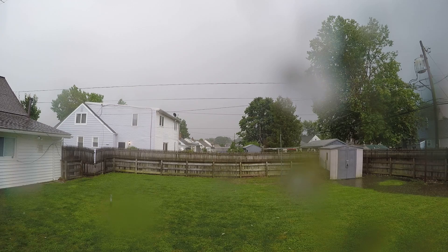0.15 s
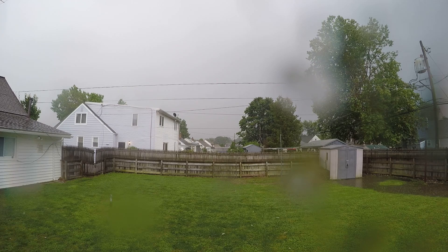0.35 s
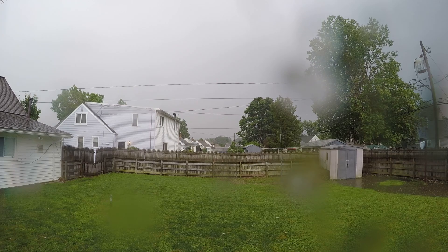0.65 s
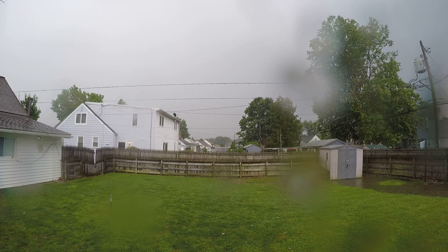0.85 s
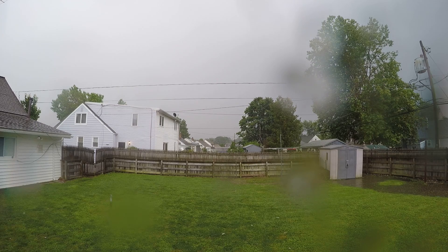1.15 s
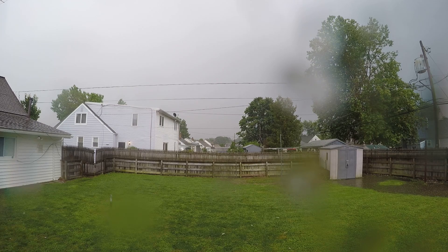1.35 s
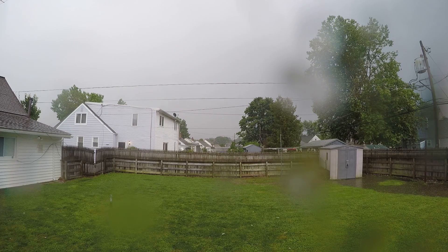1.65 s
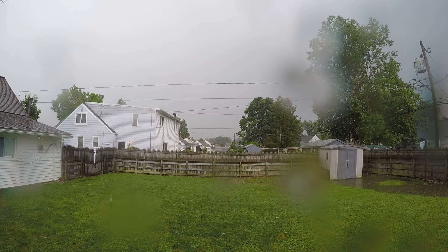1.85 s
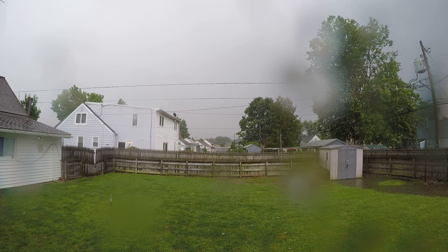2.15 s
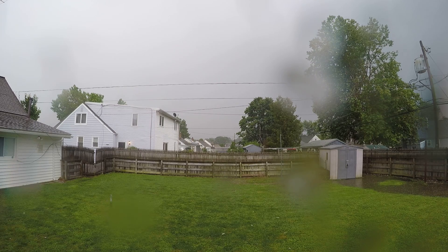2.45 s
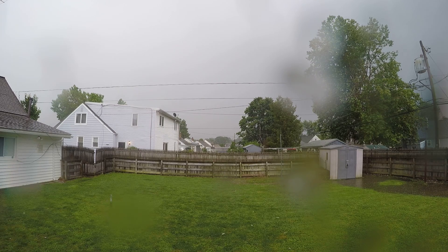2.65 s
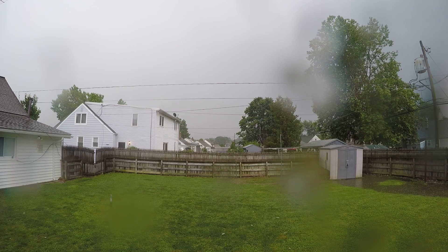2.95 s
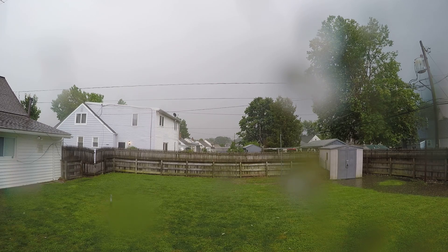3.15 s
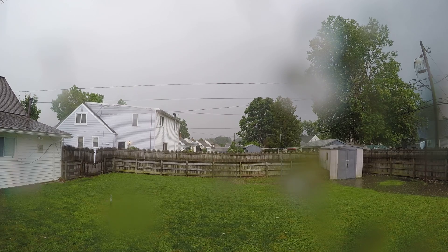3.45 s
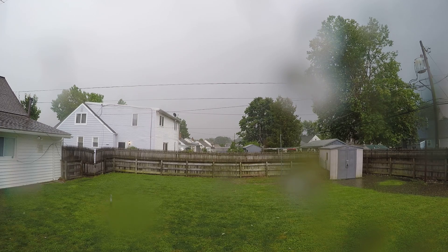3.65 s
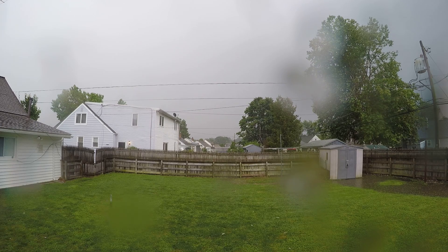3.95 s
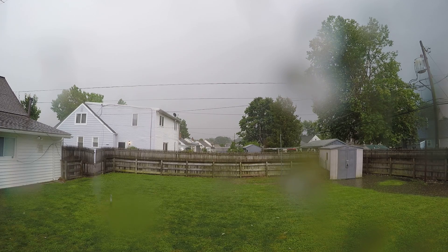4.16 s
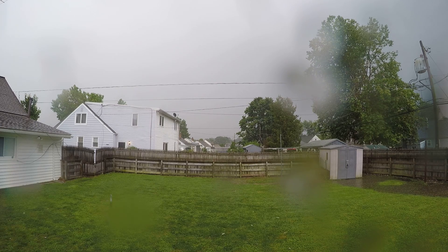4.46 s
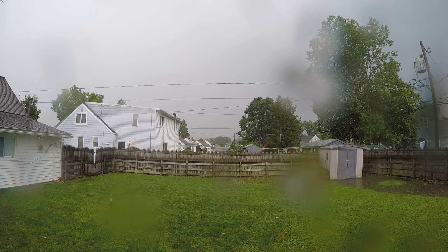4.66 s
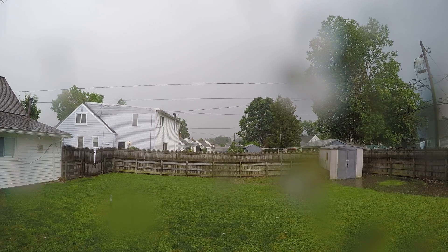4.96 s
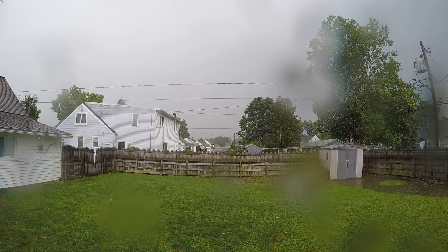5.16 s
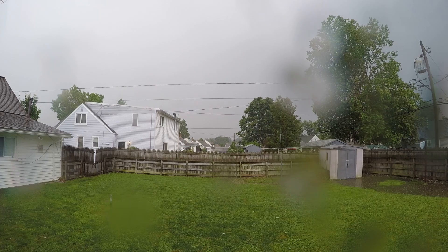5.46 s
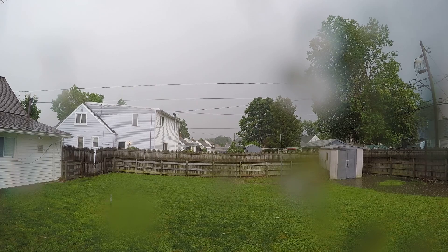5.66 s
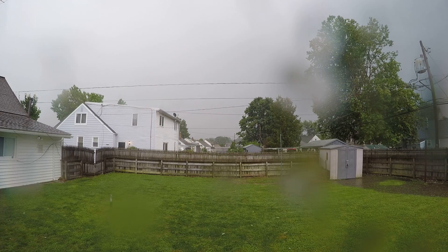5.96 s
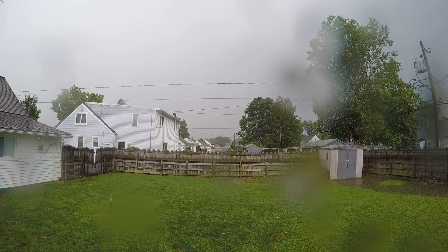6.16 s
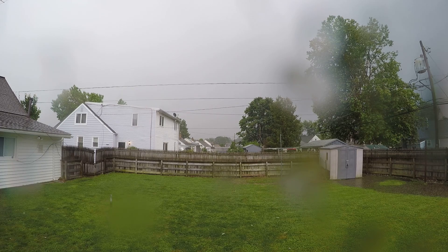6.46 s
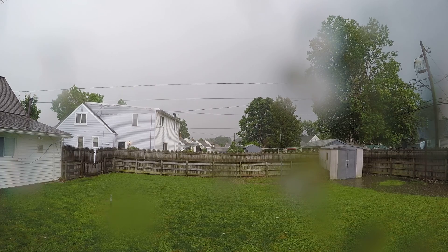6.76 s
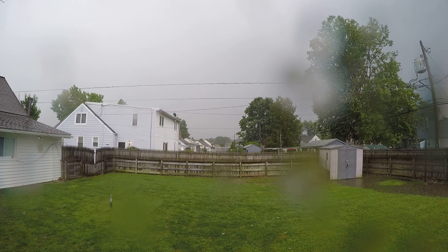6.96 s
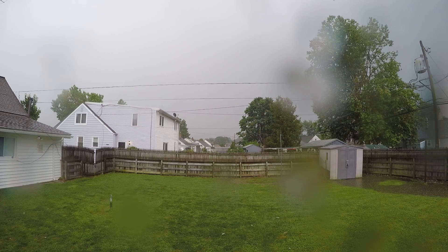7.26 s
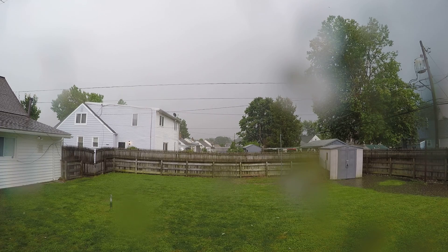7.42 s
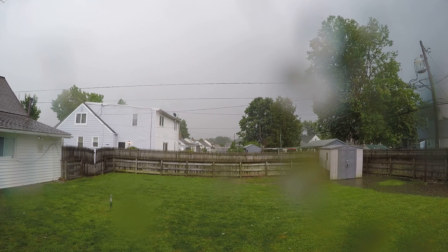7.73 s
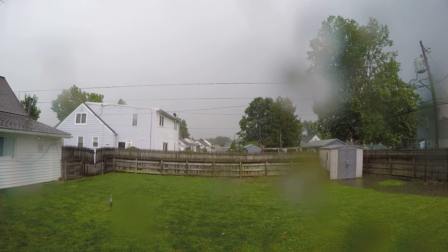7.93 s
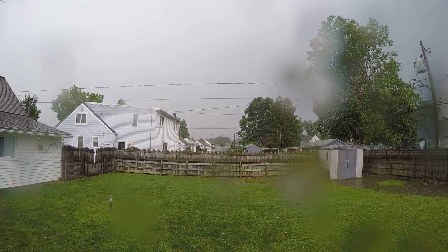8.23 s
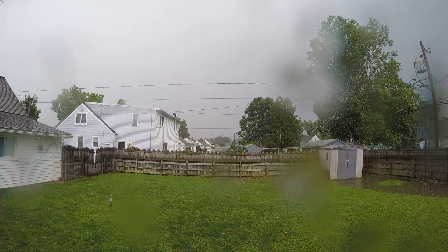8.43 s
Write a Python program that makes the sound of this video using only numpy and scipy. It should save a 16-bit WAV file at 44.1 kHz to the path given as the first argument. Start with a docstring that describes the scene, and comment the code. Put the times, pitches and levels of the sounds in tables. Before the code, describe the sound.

Rain falls on a yard for about eight and a half seconds. In the background, a soft, steady wash covers lawn and roofs, with a fine patter of small drops closer in and a faint, wavering low hum underneath. Up front and far louder, large drops strike the microphone's hard housing as sharp, dry ticks, irregularly and several times a second. Each has a tiny bright splash and a very short ring, and some add a slight low thud. Strong hits land at about 0.4, 2.2, 2.9 and 4.1 seconds. The loudest come at 4.5 and 5.1 seconds, briefly overloading. The background rain swells slightly just after 5 seconds, then dips for half a second while the ticks briefly pause. The tapping resumes, with strong hits near 7.0 and 7.9 seconds, and only lighter ticks follow to the end.

```python
"""A yard in heavy rain, heard by a microphone in a small hard housing on a springy mount.
At the back, rain washes over lawn and roofs above a wavering low hum; closer in, small drops patter.
Up front, large drops hit the housing as sharp ticks: each knocks, splashes, rings the shell,
shakes the mount and throws up spray that falls back. The loudest hits overload."""
import sys
import numpy as np
from scipy import signal
from scipy.io import wavfile

SR = 44100
rng = np.random.default_rng(int(sys.argv[2]) if len(sys.argv) > 2 else 0)


def master(y):
    """Save y as 16-bit WAV."""
    cut = np.clip(np.atleast_2d(y).T, -1, 1)
    pcm = np.round(cut * 32767)  # scale
    wavfile.write(sys.argv[1], SR, pcm.astype(np.int16))


N = 378819

# tone colour of the far rain: f/Hz, relative spectral density/dB
WASH_SPECTRUM = [(20, -15.5), (50, -10.5), (90, -5.5), (170, -5.5), (250, -17), (500, -18.5), (900, -16),
                 (1300, -17), (2000, -10.5), (2900, -18.5), (4000, -20), (5200, -23), (7500, -28),
                 (14500, -35.5), (16000, -35)]
# resonances of the low and the upper hum: f/Hz, width/Hz
HUM_BANDS = [(50, 11), (126, 32)]
# fader curve of the low hum: t/s, level/dB
LOW_HUM_FADER = [(0.0, -52), (0.71, -58.5), (3.73, -47), (4.26, -60.5), (5.19, -50), (5.38, -61.5),
                 (5.79, -53), (8.47, -55), (8.59, -63)]
# wash, upper hum and patter swell and dip briefly together: t/s, gain/dB
RAIN_FADER = [(0, 0.5), (5.03, 2.5), (5.12, 4.5), (5.235, 6.5), (5.255, -2.5), (5.5, -6), (5.57, -2.5),
              (5.85, 1.5), (8.59, 3.5)]
# quickly damped modes of the housing: f/Hz, level/dB, t60/s
KNOCK_MODES = [(782, -6, 0.023), (1048, 1, 0.013), (1280, 0.5, 0.011), (1504, -0.5, 0.0053),
               (1954, 0, 0.011), (2419, -1.5, 0.0063), (2584, -7.5, 0.016), (2848, -3, 0.013),
               (3322, -3.5, 0.0086), (3833, 1.5, 0.0083), (4180, -6, 0.012), (4750, -8, 0.0069),
               (5810, 1.5, 0.0071), (7010, 4, 0.0077)]
# lasting modes of the shell: f/Hz, level/dB, t60/s
SHELL_MODES = [(1150, -27, 0.096), (1790, -3, 0.076), (2120, -5, 0.061), (2550, -14, 0.085),
               (2700, -17, 0.059)]
# a high shell mode that only the bright splash excites: f/Hz, level/dB, t60/s
PING_MODES = [(5755, -32, .05)]
# sway and thud of the mount: f/Hz, level/dB, t60/s
MOUNT_MODES = [(47, -8.5, 0.21), (123.6, 1, 0.25), (210, -10, 0.039), (363, -10.5, 0.0072)]
# large drops on the housing, with three sends relative to the hit's level:
# t/s, level/dB, pitch of the struck spot/Hz, pitch spread/octaves, splash/dB, shell/dB, mount/dB
LARGE_DROPS = [(0.0085, -4, 2320, 0.53, -21, -27, -42), (0.0248, -27.5, 2780.0, 0.55, -26.0, -15, -25),
               (0.21, -26.5, 1510, 0.68, -27.0, -16, -31), (0.2411, -25.5, 2070.0, 0.14, -16, -19, -32),
               (0.3047, -20.5, 1660.0, 0.56, -29, -48.0, -50.0), (0.3575, -7, 1490, 0.25, -48.0, -28, -54),
               (0.4064, 7, 2660, 0.4, -18, -27.5, -39.5), (0.414, -10, 3900.0, 0.33, -22.0, -37.0, -24),
               (0.563, -27, 2070, 0.21, -19.0, -49, -50), (0.706, -14, 2380, 0.44, -17, -32.0, -31.5),
               (1.1946, -12.5, 1870, 0.45, -28.0, -23, -32.5), (1.245, -6.5, 2580, 0.91, 0, -22, -30.5),
               (1.3137, -17, 2620, 0.12, -20, -54.0, -54), (1.3642, -20.5, 3460, 0.57, -4.5, -24, -56.0),
               (1.3794, -17.5, 2620, 0.49, -27.0, -27.0, -59.0),
               (1.4373, -24.5, 2260, 0.22, -19, -48.0, -41), (1.4591, -19.5, 2060, 0.31, -23.0, -17, -33),
               (1.597, -7.5, 3300, 0.64, -2, -29.5, -31.5), (1.645, -19.0, 3120, 0.36, -16, -48.0, -45.0),
               (1.846, -11.5, 2800, 0.54, -14, -30.0, -52.0), (1.9355, -16, 2250, 0.31, -17.5, -25, -38.0),
               (2.0489, -6.5, 2280, 0.38, -17.5, -33, -39.5), (2.215, -9, 3350, 0.23, -23, -44.0, -40),
               (2.2352, 1.5, 3100, 0.55, -20, -26, -42.5), (2.2397, -25, 4500.0, 0.78, -20.0, -35.0, -49),
               (2.3149, -27.5, 1210, 0.58, -36.0, -40.0, -14),
               (2.4762, -20.5, 2650, 0.78, -18, -33.0, -20.5), (2.549, -21.5, 2960, 0.5, -8.5, -45.0, -47),
               (2.5957, -24, 2980, 0.49, -6, -50.0, -24.5), (2.778, -13.5, 2000, 0.41, -21, -15.5, -39),
               (2.7902, -25.5, 2120.0, 0.39, -19.0, -11.0, -28.0),
               (2.85, -26.5, 3500.0, 0.62, -8.0, -47.0, -44.0),
               (2.9227, -0.5, 3180, 0.64, -9.0, -31, -30.5), (3.0331, -15, 2570, 0.38, -8, -57, -25.5),
               (3.2195, -27, 1650, 0.69, -16.0, -21, -43.0), (3.2612, -12, 2230, 0.46, -3, -29, -32),
               (3.2815, -28.5, 2250.0, 0.66, -17, -25.0, -33.0),
               (3.3894, -27, 3450, 0.86, -1.5, -48.0, -30.0), (3.4686, -21, 1930.0, 0.39, -28, -31, -30),
               (3.5222, -7, 2400, 0.43, -16.5, -31, -42), (3.5445, -17.5, 2430, 0.41, -21, -26, -48.0),
               (3.601, -28.5, 2540, 0.55, -18, -46, -40.0), (3.7254, -29, 2680, 0.38, -8, -41.0, -25),
               (4.0122, -19, 1860, 0.48, -26.0, -18.5, -29), (4.0975, -25.0, 2800.0, 0.55, -16, -46.0, -40),
               (4.1386, 0.5, 2740, 0.44, -9.5, -25, -41.5), (4.2484, -5.5, 3300, 0.51, -17.0, -40.0, -39),
               (4.2824, -28.0, 3130.0, 0.45, -21.0, -26, -49.0), (4.3013, -11.5, 2540, 0.51, -5, -25, -50),
               (4.5225, -24.5, 1870, 0.31, -8.0, -10, -21), (4.5488, 9, 2510, 0.61, -12.5, -32.0, -38.5),
               (4.565, -21, 2790, 0.14, -23.0, -30.0, -47), (4.6376, -31.5, 1980.0, 0.6, -17.0, -3, -47.0),
               (4.6425, -6.5, 3070, 0.25, -13.5, -43, -63.0), (4.864, -18, 880, 0.27, -41.0, -53, -32),
               (4.9053, -31.5, 3030.0, 0.84, -13.0, -55, -37.0),
               (4.9242, -24.5, 1910.0, 0.27, -28.0, -45.0, -26),
               (5.0345, -8.5, 2570.0, 0.61, -14, -32, -36), (5.0728, -13.5, 3920, 0.96, 1.5, -25, -19),
               (5.0763, -19, 2020.0, 0.53, -21, -27, -44.0), (5.0909, 9, 2960, 0.51, -15, -24, -36.5),
               (5.5602, -17.0, 2710, 0.37, -11.0, -27, -36),
               (5.5814, -25.5, 1530.0, 0.43, -37.0, -48, -44.0),
               (5.6169, -18.5, 2450, 0.48, -7, -24.0, -35), (5.6914, -15.5, 3340, 0.49, -11.5, -57, -35),
               (5.8052, -5.5, 2430, 0.42, -8, -29, -31.5), (5.8331, -29.5, 2510.0, 0.41, -3, -54.0, -48.0),
               (5.878, -7, 2200, 0.33, -4.5, -15.5, -34.5), (6.0785, -28, 2740, 0.16, -18, -43, -23),
               (6.11, -25.5, 2460, 0.55, -14, -46.0, -43.0), (6.1626, -11.5, 1300, 0.54, -29, -23, -30),
               (6.2609, -22, 2600.0, 0.09, -12.0, -46, -42), (6.299, -14.5, 3020, 0.46, -15, -33, -54.0),
               (6.527, -28, 2400.0, 0.24, -30.0, -46.0, -37), (6.5598, -21, 1790, 0.45, -26.0, -45, -56),
               (6.6744, -12, 2550.0, 0.49, -10.5, -24, -32), (6.741, -30.5, 2190.0, 0.28, -20.0, -11, -44),
               (6.7487, -27, 2480, 0.46, -22, -48, -45.0), (6.8174, -25, 1350, 0.72, -25, -46.0, -45.0),
               (6.8689, -9.5, 2740, 0.35, -24, -37, -31.5), (6.9352, -6.5, 3970, 0.43, -6.5, -27.5, -34.5),
               (6.9844, 1.5, 2300, 0.2, -18, -23.5, -43), (7.0766, -19.5, 2620, 0.43, -13, -35.0, -26),
               (7.1983, -10, 2210, 0.46, -19.5, -28, -49.0), (7.245, -33.5, 785.0, 0.18, -30.0, -44, -40.0),
               (7.3944, -32, 2340, 0.42, -25.0, -23, -35), (7.4092, -24, 2650.0, 0.11, -29.0, -42.0, -35.0),
               (7.5898, -13, 2520, 0.28, -23, -37, -31.5), (7.728, -27.5, 2860, 0.37, -34.0, -39.0, -28),
               (7.8206, -10, 2170, 0.6, -17, -24.0, -55.0),
               (7.8481, -26.5, 1530.0, 0.48, -29.0, -40.0, -37),
               (7.8809, -2.5, 3340.0, 0.47, -9.5, -30, -36), (7.903, -30, 2230.0, 0.3, -23.0, -25.0, -45.0),
               (7.9226, -27, 2900.0, 0.41, -16, -46.0, -27), (7.9956, -25.5, 2530, 0.29, -11, -50.0, -49.0),
               (8.198, -22, 910, 0.27, -23, -44.0, -38), (8.291, -30.5, 3150, 0.28, -10, -28.0, -45.0),
               (8.305, -27.5, 1050.0, 0.43, -33.0, -40.0, -39.0),
               (8.3337, -24.5, 980.0, 0.22, -19.0, -40.0, -30.0),
               (8.374, -30.5, 2110, 0.27, -25, -42.0, -39.0)]

WASH_DB, UPPER_HUM_DB = -57.5, -59.5   # ahead of the rain fader
PATTER_PER_S, PATTER_FLOOR_DB, PATTER_SPREAD_DB = 270, -61.5, 7.5
SPRAY_SEND_DB, SPRAY_WINDOW_S = -27, 0.03
CLIP_LEVEL, CUTOFF_HZ = 0.93, 16300


def from_db(db):
    """Decibels to gain."""
    return 10 ** (np.asarray(db) / 20)


def rms_one(x):
    """Scale to rms 1."""
    return x / np.sqrt(np.mean(x ** 2) + 1e-20)


def fader(curve):
    """A curve of t/s, level/dB as a gain at every sample."""
    s, level_db = np.transpose(curve)
    return from_db(np.interp(np.arange(N) / SR, s, level_db))


def drift(rate):
    """Smooth random modulation of spread 1, moving about rate times a second."""
    r = np.exp(-80 * np.pi * rate / SR)
    slow = signal.lfilter([1], [1, -2 * r, r * r], rng.standard_normal(N // 40 + 2002))[2000:]
    return np.interp(np.arange(N) / 40, np.arange(len(slow)), rms_one(slow))


def bandpass(x, low_hz, high_hz):
    """A band-pass with gentle slopes."""
    return signal.sosfilt(signal.butter(2, [low_hz, high_hz], "band", fs=SR, output="sos"), x)


def ring(push, hz, t60):
    """A resonator: a unit click sets off a decaying sine of height 1."""
    r, w = from_db(-60 / (t60 * SR)), 2 * np.pi * hz / SR
    return signal.lfilter([0, np.sin(w)], [1, -2 * r * np.cos(w), r * r], push + 1e-18)


def clicks_at(s, gain):
    """A click train with the given heights at the given times."""
    samples = np.clip(np.round(s * SR).astype(int), 0, N - 1)
    return np.bincount(samples, gain, N) + 1e-18


def wash(flicker_db):
    """The bed of far rain on lawn and roofs: flickering third-octave bands of noise, at rms 1."""
    edges = 22 * 2 ** np.arange(0, 9.8, 1 / 3)
    hz, level_db = np.transpose(WASH_SPECTRUM)
    shared_drift = drift(8)
    white = rng.standard_normal((2, N))
    bed = 0
    for k, (low, high) in enumerate(zip(edges, edges[1:])):
        band = bandpass(white[k % 2], low, high)
        colour_db = np.interp(np.log(low * high) / 2, np.log(hz), level_db)
        flicker = .3 * shared_drift + drift(25)
        bed = bed + band * from_db(colour_db + flicker_db * flicker)
    return rms_one(bed)


def hum(hz, width_hz):
    """A wavering drone: noise twice through a narrow low resonance, at rms 1."""
    t60 = np.log(1000) / (np.pi * width_hz)
    return rms_one(ring(ring(rng.standard_normal(N), hz, t60), hz, t60))


def strike(s, level_db, modes, scatter_db, contact, spot_hz=None, octaves=None):
    """Every hit drives every mode with its own strength and sign; smaller contact softens the attack."""
    hz, mode_db, t60 = np.transpose(modes)
    chance = rng.standard_normal((len(s), 2 * len(modes)))
    gain = from_db(mode_db + scatter_db * chance[:, ::2]) * np.sign(chance[:, 1::2])
    if spot_hz is not None:   # modes near the pitch of the struck spot speak most
        distance = np.log2(hz / spot_hz[:, None]) / np.maximum(octaves, .1)[:, None]
        gain = gain * (np.exp(-distance ** 2 / 4) + 0.045)
        gain = gain / np.sqrt(np.sum(gain ** 2, axis=1, keepdims=True))
    gain = gain * from_db(level_db)[:, None]
    body = 0
    for k in range(len(modes)):
        # water is soft: the push builds over a few cycles, so a mode swells instead of snapping
        push = bandpass(clicks_at(s, gain[:, k]), hz[k] / (1 + contact), hz[k] * (1 + contact))
        body = body + ring(push, hz[k], t60[k])
    return body


def splash(s, level_db, t60):
    """The water bursts apart: a bright spit of noise that dies within milliseconds."""
    decay = from_db(-60 / (t60 * SR))
    envelope = signal.lfilter([1], [1, -decay], clicks_at(s, from_db(level_db)))
    return bandpass(envelope * rng.standard_normal(N), 5200, 13500)


def droplets(s, level_db):
    """Small drops tick and spit on random spots of the housing."""
    pitch, spread, dryness = rng.random((len(s), 3)).T
    spot_hz = 1300 * (4500 / 1300) ** pitch
    knock = strike(s, level_db, KNOCK_MODES, scatter_db=5.5, contact=0.8,
                   spot_hz=spot_hz, octaves=0.26 + 0.22 * spread)
    return knock + splash(s, level_db - 7.5 - 18 * dryness, t60=0.0034)


def patter_hits():
    """Times and levels of small drops landing at random: most are faint, a few poke out."""
    when, size_rank = rng.random((int(PATTER_PER_S * N / SR), 2)).T
    s = when * N / SR
    level_db = PATTER_FLOOR_DB - PATTER_SPREAD_DB * np.log(np.maximum(size_rank, .02))
    return s, level_db + np.interp(s, *np.transpose(RAIN_FADER))


def spray_hits():
    """Times and levels of three droplets that each large drop throws up and that fall back just after."""
    drops = np.array(LARGE_DROPS)
    drop_s, drop_db = drops[:, :1], drops[:, 1:2]
    flight = rng.random((len(drops), 3))
    s = drop_s + .004 + SPRAY_WINDOW_S * flight
    level_db = np.minimum(drop_db, 0) + SPRAY_SEND_DB - 12 * flight   # later ones are smaller
    return s, level_db


def large_drops():
    """The close hits: a knock for attack, splash and ping on top, a shell tail, a mount thud below."""
    s, level_db, spot_hz, octaves, splash_db, shell_db, mount_db = np.transpose(LARGE_DROPS)
    knock = strike(s, level_db + 1.5, KNOCK_MODES, scatter_db=2.5, contact=0.53,
                   spot_hz=spot_hz, octaves=octaves)
    shell = strike(s, level_db + shell_db, SHELL_MODES, scatter_db=7.0, contact=0.48)
    mount = strike(s, level_db + mount_db + 2.0, MOUNT_MODES, scatter_db=1.2, contact=0.88)
    ping = strike(s, level_db + splash_db, PING_MODES, scatter_db=2.0, contact=0.3)
    spit = splash(s, level_db + splash_db + 1.5, t60=0.0042)
    return knock + spit + ping + shell + mount


def scene():
    """The mono mix: a bed of wash and hum, patter and spray over it, large drops up front."""
    low_band, upper_band = HUM_BANDS
    bed = from_db(WASH_DB) * wash(flicker_db=3.5) + from_db(UPPER_HUM_DB) * hum(*upper_band)
    hits = large_drops()
    patter_s, patter_db = patter_hits()
    spray_s, spray_db = spray_hits()
    small_drops = droplets(np.append(patter_s, spray_s), np.append(patter_db, spray_db))
    low_hum = fader(LOW_HUM_FADER) * hum(*low_band)
    return (fader(RAIN_FADER) * bed + low_hum + small_drops + hits)[None]


def record(dry):
    """The converter hard-clips the loudest hits; a steep low-pass takes off the very top."""
    lowpass = signal.cheby2(22, 90, CUTOFF_HZ, fs=SR, output="sos")
    return signal.sosfilt(lowpass, np.clip(dry, -CLIP_LEVEL, CLIP_LEVEL))


dry = scene()
out = record(dry)
master(out)
```